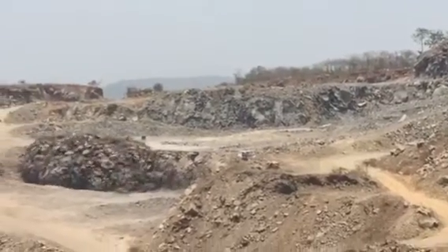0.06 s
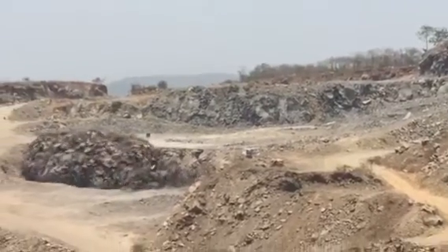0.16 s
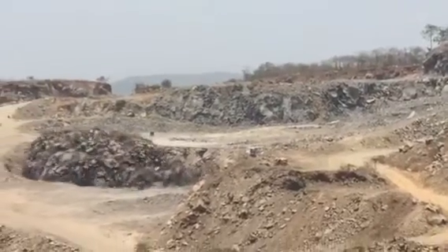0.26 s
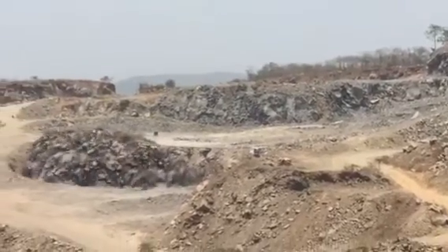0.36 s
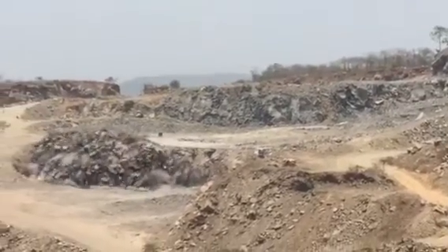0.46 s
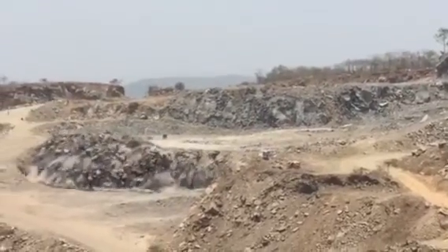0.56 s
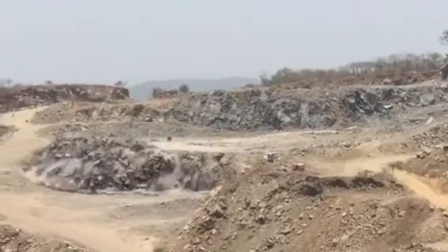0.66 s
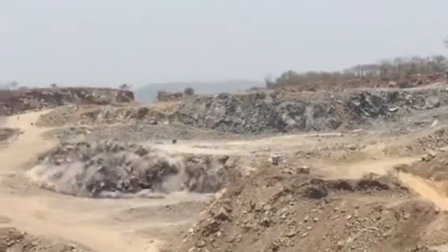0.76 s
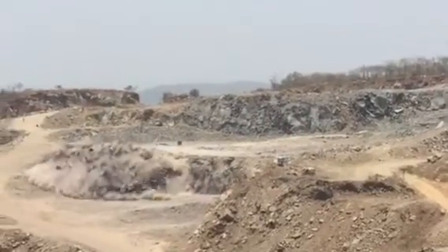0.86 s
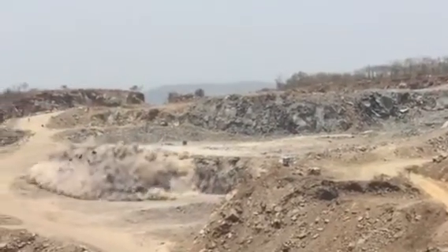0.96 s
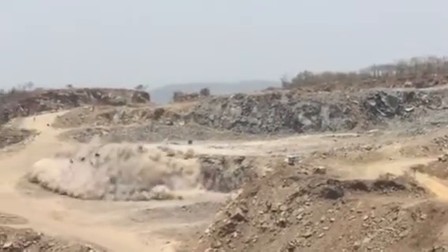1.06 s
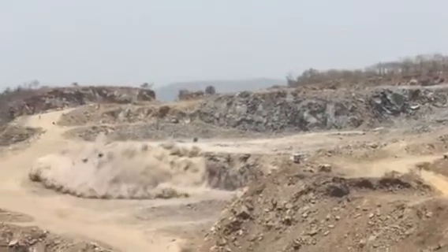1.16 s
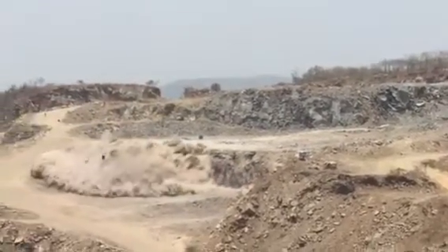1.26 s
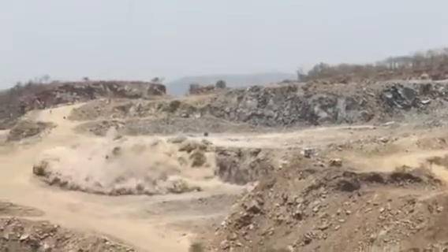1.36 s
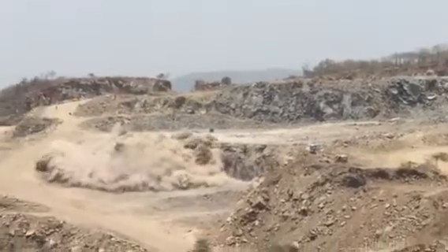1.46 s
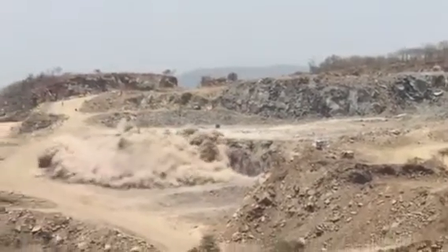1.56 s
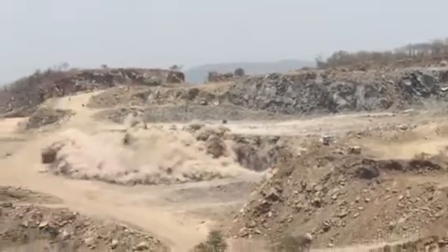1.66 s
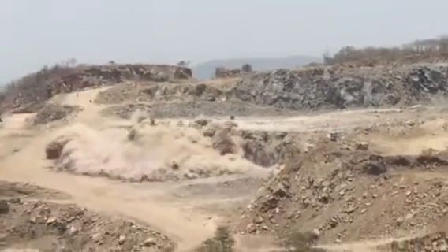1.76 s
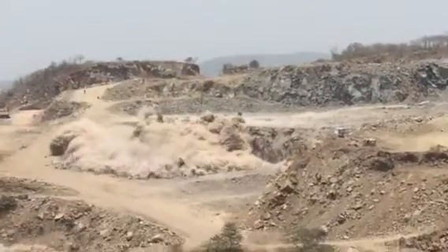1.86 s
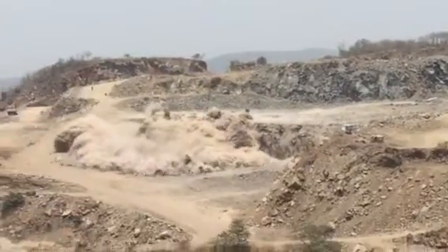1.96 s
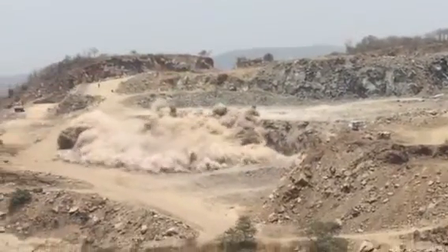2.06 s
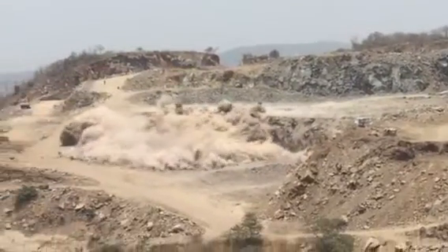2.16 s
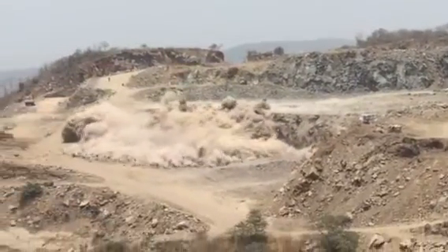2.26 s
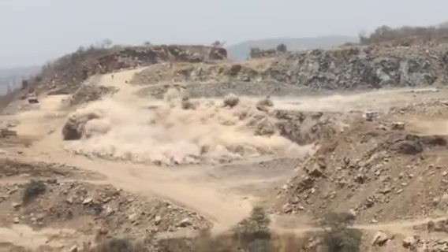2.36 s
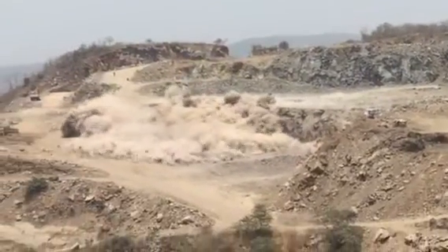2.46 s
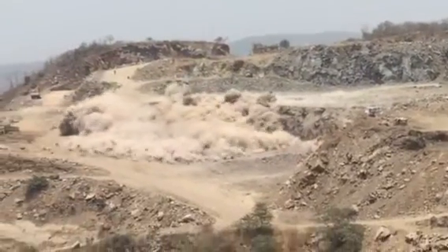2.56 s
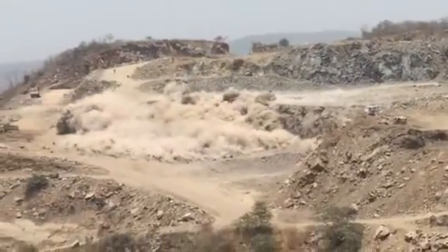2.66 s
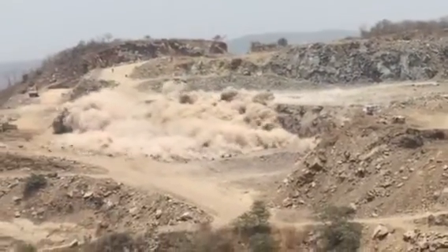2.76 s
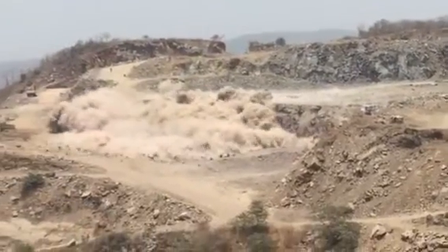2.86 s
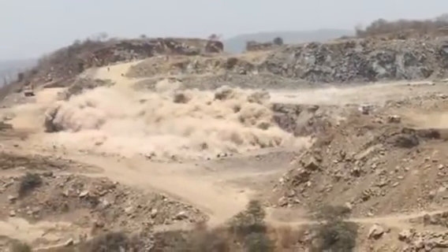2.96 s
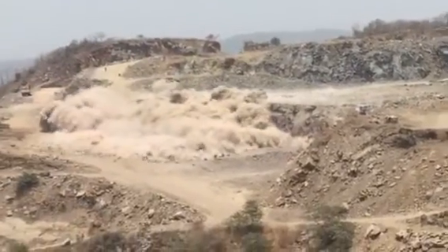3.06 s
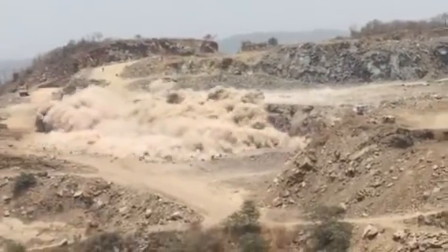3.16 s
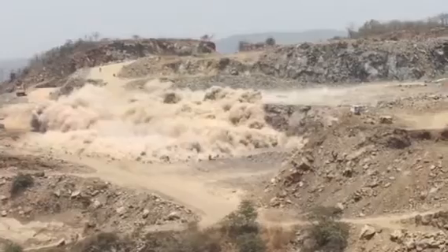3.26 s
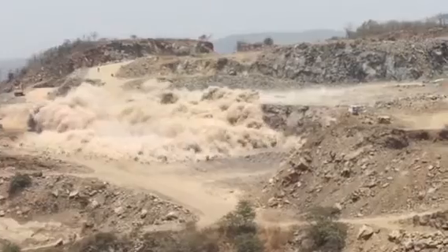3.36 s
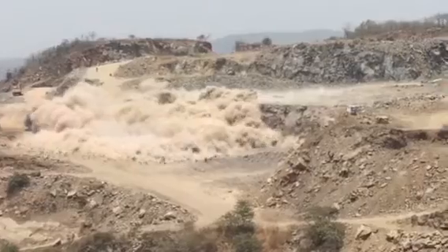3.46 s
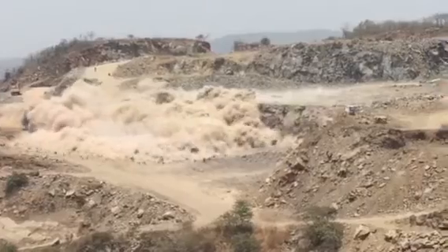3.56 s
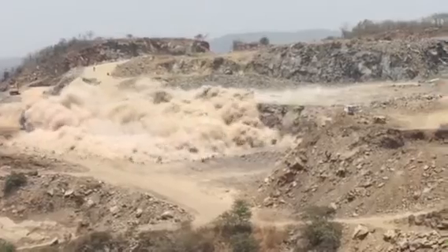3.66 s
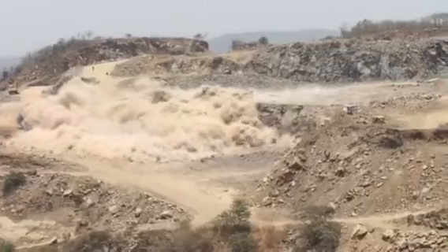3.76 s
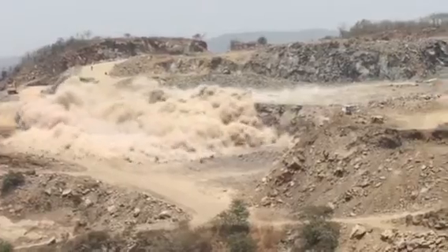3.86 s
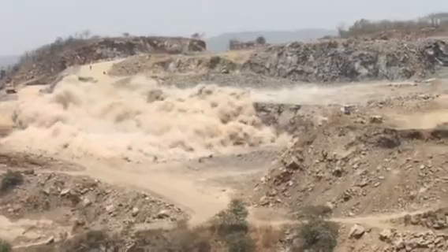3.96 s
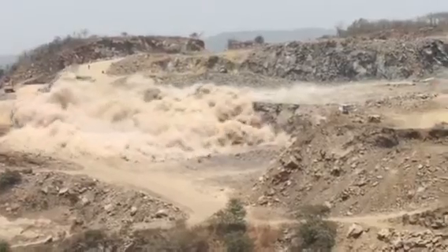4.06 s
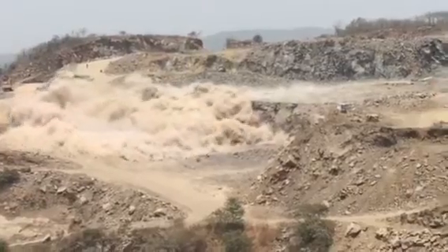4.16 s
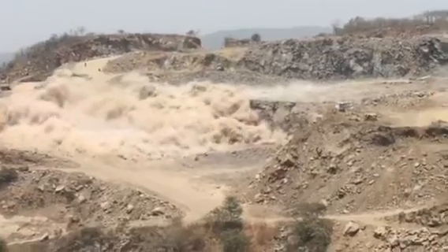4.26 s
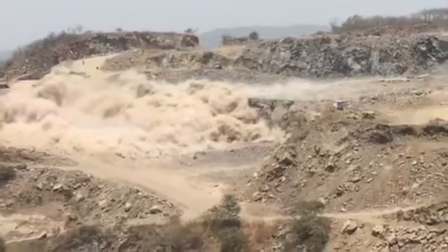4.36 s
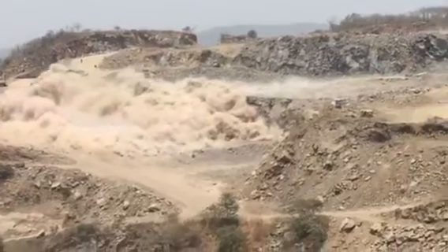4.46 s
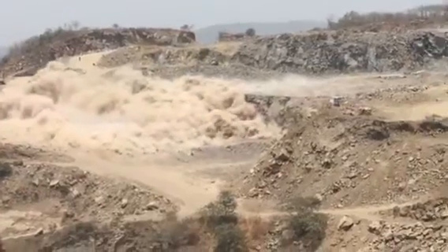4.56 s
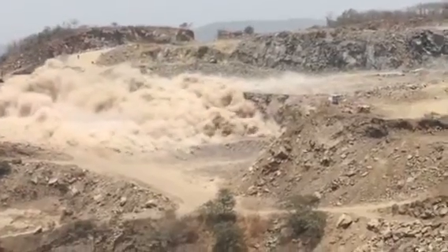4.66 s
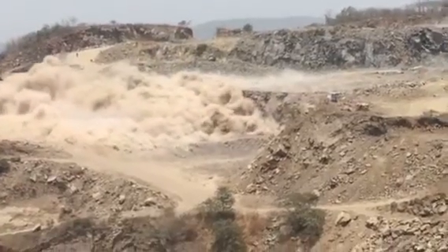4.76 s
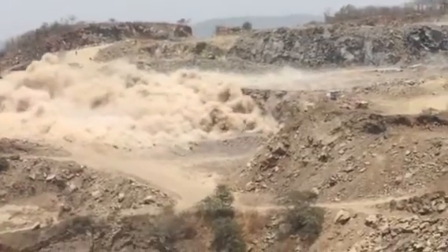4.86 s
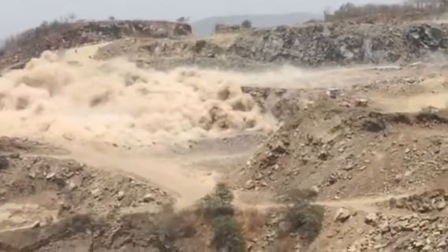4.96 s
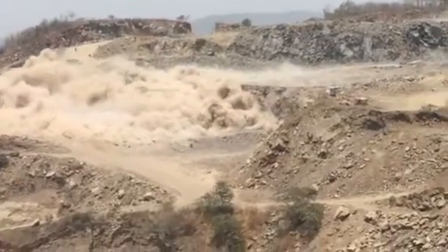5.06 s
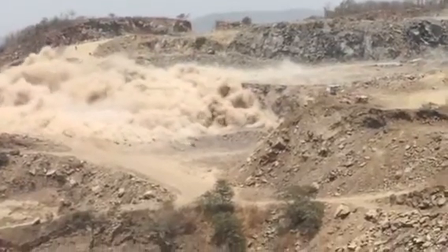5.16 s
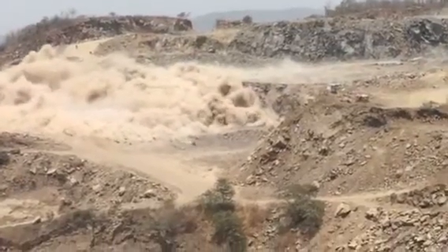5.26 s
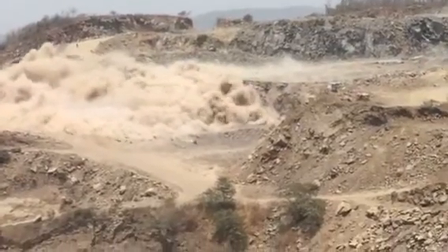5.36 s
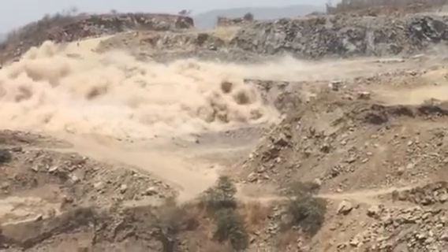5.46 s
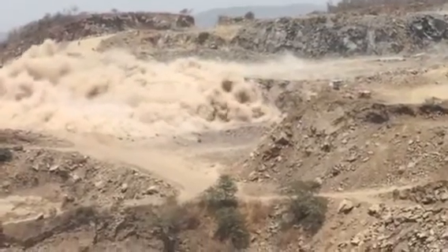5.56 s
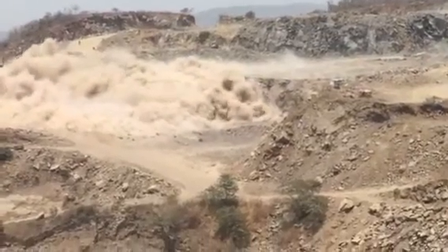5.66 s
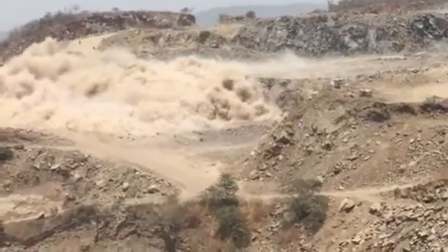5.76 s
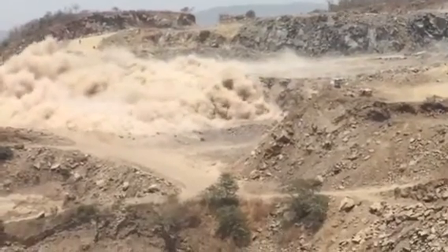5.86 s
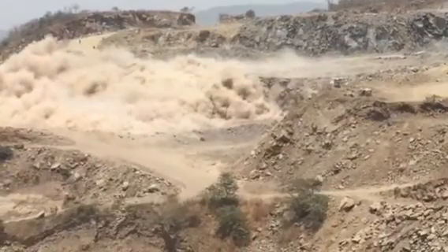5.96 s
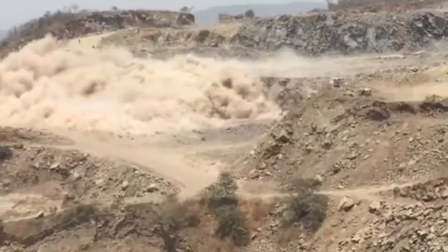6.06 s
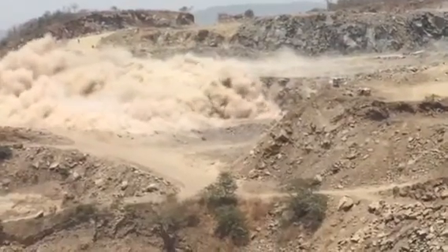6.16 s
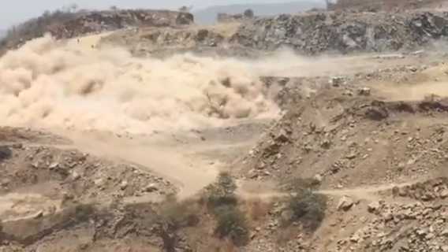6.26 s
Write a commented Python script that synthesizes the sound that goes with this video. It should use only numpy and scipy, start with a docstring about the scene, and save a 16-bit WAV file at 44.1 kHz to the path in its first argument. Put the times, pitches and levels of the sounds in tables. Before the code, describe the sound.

A rapid crackle of detonators bursts into heavy overloaded bangs, then a long rushing rockslide swells, thins and ends in scattered stone knocks.

```python
"""A quarry blast heard from the rim: detonators crackle along the bench, then charges burst and the ground heaves.
The cracks and bangs are short pressure pulses trailed by noise scatter; the heaves are brief low sines.
The face collapses in a long rush of boulders, stones and grit, each a dense hail of coloured impacts.
Last rocks knock, ring and tumble down one by one, over scuffs and a faint wash of wind.
The pit walls answer with a diffuse tail, and the heaviest blows overload the microphone."""
import sys
import numpy as np
from scipy import signal
from scipy.fft import rfft, irfft, next_fast_len
from scipy.io import wavfile
from scipy.ndimage import uniform_filter1d, map_coordinates

SR = 44100
rng = np.random.default_rng(int(sys.argv[2]) if len(sys.argv) > 2 else 0)


def dump_mix(stems):
    """Bounce the given channels to the path in sys.argv[1] as a 16-bit WAV at rate SR."""
    frames = np.atleast_2d(stems).T  # one column per channel
    limited = np.clip(frames, -1, 1)  # hard clip at full scale
    pcm = np.round(limited * 32767).astype(np.int16)
    wavfile.write(sys.argv[1], SR, pcm)


N = 278712

# Levels in the event tables are in dB; some layers add a gain of their own.
# surface detonators [t/s, level/dB, treble level/dB]
DETONATORS = [(.004, -10, -27), (.0265, -7, -22.5), (.047, -9, -30), (.065, -8, -23), (.078, -9, -33),
              (.096, -9, -24.5), (.109, -15.5, -38), (.1205, -7, -44), (.137, -12.5, -24.5),
              (.151, -9.5, -25), (.181, -8, -31.5), (.244, -21.5, -34.5), (.274, -15.5, -36.5)]
# charges breaking out of their holes [t/s, level/dB, f/Hz above which the overburden muffles them]
CHARGES = [(0.3051, -6.5, 1200), (0.3115, -5.5, 5000), (0.318, 2.5, 2400), (.324, -2.5, 6000),
           (.331, -9, 3500), (0.3711, -5.5, 3580), (0.394, -13, 1800), (.402, -8.5, 1800),
           (0.4251, -4, 3300), (0.454, -9, 3000), (.4637, -8, 12000), (.519, -18, 2580)]
# the bench heaves, bulges and drops [t/s, level/dB, f/Hz]
HEAVES = [(.245, -17, 81), (.311, -1.5, 196.5), (.321, -4.5, 311), (.342, -5.5, 69.2), (.412, -11, 137),
          (.475, -13, 74), (.545, -12.5, 98), (.572, -9.5, 70), (.612, -14.5, 127)]
# the largest boulders landing [t/s, level/dB, f/Hz]
BOULDERS = [(1.52, -7, 207), (1.76, -11, 198), (2.51, -14, 208), (2.868, -13.5, 189), (3.145, -14, 132),
            (3.39, -16.5, 335), (3.824, -19.5, 104), (4.04, -20, 136), (4.275, -21.5, 235),
            (4.33, -19.5, 262), (5.428, -29.5, 80.4), (5.642, -18, 210), (5.682, -18, 240),
            (5.742, -18, 300), (5.80, -22.5, 234), (6.132, -32.5, 106)]
# single rocks striking rock [t/s, level/dB, treble level/dB]
KNOCKS = [(3.277, -9, -54), (4.793, -29, -52), (5.18, -22, -44), (5.214, -22.5, -65), (5.36, -31, -60),
          (5.403, -27, -41), (5.497, -39, -36.5), (5.553, -27, -50), (5.631, -22, -52), (5.642, -19, -38),
          (5.68, -17.5, -45), (5.728, -24, -44), (5.745, -17.5, -41.5), (5.791, -26.5, -48),
          (5.849, -31.5, -45), (6.036, -27, -46.5), (6.19, -30.5, -60), (6.236, -28, -48)]
# hard stones that ring briefly when hit [t/s, level/dB, f/Hz]
PINGS = [(3.279, -48, 2860), (4.52, -53, 9500), (4.789, -40.5, 4360), (4.892, -35, 1960),
         (5.058, -36, 2620), (5.491, -38, 2760), (6.06, -42, 2720)]
# short scuffs close to the microphone [t/s, level/dB]
SCUFFS = [(4.625, -44.5), (5.051, -38.5), (5.489, -57)]

# Spectra give the tone only: the sound is rescaled after shaping.
# detonator crack, also the bright spray of every blow [f/Hz, level/dB]
CRACK_SPECTRUM = [(59, -54), (100, -7), (258, -7), (293, -9), (370, 0.5), (429, -11), (697, 3), (808, -4),
                  (1290, -6.5), (1550, -17), (2180, -16.5), (4860, -33.5), (5750, -31.5), (9150, -45.5),
                  (15500, -71)]
# charge before muffling [f/Hz, level/dB]
BANG_SPECTRUM = [(150, -25.5), (400, -2), (650, 4.5), (1280, -1), (2300, -10.5), (4400, -21), (7000, -25.5),
                 (10000, -38), (15500, -65)]
# rock striking rock [f/Hz, level/dB]
KNOCK_SPECTRUM = [(220, -22), (380, 0), (408, -5), (639, -1), (749, 0.5), (1350, -9.5), (1710, -9.5),
                  (2150, -10), (2630, -17.5), (3830, -21), (6260, -32), (12000, -77), (15600, -84),
                  (22000, -120)]
# boulders, crumbling masses and shaken ground [f/Hz, level/dB]
RUMBLE_SPECTRUM = [(13, -52), (22, -28), (59, -3), (150, -4.5), (201, -1), (278, -9), (354, -5.5),
                   (387, -9.5), (422, -21), (450, -27), (580, -46), (990, -120)]
# sliding stones [f/Hz, level/dB]
STONES_SPECTRUM = [(240, -4.5), (400, -11), (456, -7), (639, 3), (757, -1.5), (874, -2), (945, -7.5),
                   (1280, -4.5), (1990, -10), (3620, -20.5), (4510, -21.5), (4940, -24), (6410, -19),
                   (9000, -54), (11700, -74), (19800, -120)]
# sliding grit [f/Hz, level/dB]
GRIT_SPECTRUM = [(710, -0.5), (1200, 9.5), (1620, -7.5), (1900, -1), (2770, -10), (4530, -17.5),
                 (4930, -21), (5610, -20.5), (9080, -33), (11500, -51.5), (14400, -67), (15500, -72)]
# gritty scrape [f/Hz, level/dB]
SCUFF_SPECTRUM = [(300, -30), (1800, 6), (2700, 13), (3500, -6), (6000, -2), (9000, -16), (11000, -11),
                  (15500, -28)]
# wind over the pit [f/Hz, level/dB]
AIR_SPECTRUM = [(20, -8.5), (70, 13), (300, -17), (1000, -5), (4000, -15.5), (8000, -77), (11000, -39.5),
                (15500, -52)]
# decay of the pit's answer [f/Hz, t60/s]
PIT_DECAY = [(100, 1), (1000, 0.27), (4000, 0.24), (12000, 0.3)]

# the rock face throws each crack back once
SLAP_S, SLAP_LOSS_DB, SLAP_TREBLE_LOSS_DB = .0075, 3, 9
# each rock tumbles over two more edges
BOUNCE_S, BOUNCE_LOSS_DB, BOUNCE_TREBLE_LOSS_DB = .02, 8, 4
# gas thumps: level relative to the shot's own, centre pitch
PUFF_DB, PUFF_HZ = -14, 300  # detonators
THUMP_DB, THUMP_HZ = -11, 240  # charges
# the ground booms from the first charge on and passes only the lows
BOOM_DB, BOOM_ATTACK_S, BOOM_HOLD_S = -19, 0.0098, 0.17
BOOM_FADE_DB_PER_S, BOOM_TOP_HZ = 105, 240
FULL_FLOW_S = 1.52  # the slide is at its fullest
SLUMP_S, SLUMP_WIDTH_S, SLUMP_DB = 3.07, 0.58, 1.5  # a late load of stones slips down the pile
GROUND_HZ = 1200  # below this a pulse is delayed along the ground
TOP_HZ = 15750  # microphone band limit


def blast():
    """The detonator chain rattles, then the charges burst and lift the bench."""
    cracks = repeats(DETONATORS, SLAP_S, SLAP_LOSS_DB, SLAP_TREBLE_LOSS_DB, count=2)
    rattle = blows(cracks, CRACK_SPECTRUM, direct_db=-1.0, scatter_db=-6.0, scatter_t60=0.041,
                   spray_db=1.5, spray_t60=0.04, spray_hz=3000, vary_db=2.9)
    bangs = charges(scatter_db=-9.5, scatter_t60=0.046)
    puffs = amp(PUFF_DB) * gas_thumps(DETONATORS, PUFF_HZ, spread=0.24)
    thumps = amp(THUMP_DB) * gas_thumps(CHARGES, THUMP_HZ, spread=0.24)
    heave = amp(1.0) * thuds(HEAVES, cycles=0.91, rough=0.18)
    return rattle + bangs + puffs + thumps + heave + boom()


def charges(scatter_db, scatter_t60):
    """Steep pressure fronts, the duller the deeper they lie, each trailed by scatter off the rubble."""
    track, t = np.zeros(N), np.arange(SR // 8) / SR
    front = pulse(BANG_SPECTRUM)
    for s, db, muffle_hz in CHARGES:
        shape = band(front, muffle_hz, "low", order=3)
        shape /= np.abs(shape).max()
        decay = amp(scatter_db - 60 * t / scatter_t60)
        echoes = rng.standard_normal(len(t)) * decay / np.linalg.norm(shape)
        echoes[0] = 1  # the direct front
        add(track, s, amp(db) * signal.fftconvolve(echoes, shape))
    return track


def gas_thumps(shots, hz, spread):
    """The gas of every shot gives one short push, each at a slightly different pitch."""
    pushes = [(s, db, hz * np.exp(spread * rng.standard_normal())) for s, db, _ in shots]
    return thuds(pushes, cycles=1.0, rough=.2)


def thuds(table, cycles, rough):
    """A heavy mass pushes the air for a cycle or two; its crumbling roughens the push."""
    track, t = np.zeros(N), np.arange(SR // 4) / SR
    for s, db, hz in table:
        age = t * hz / cycles
        swell = age * np.exp(1 - age)
        crumble = colour(rng.standard_normal(len(t)), RUMBLE_SPECTRUM)
        push = np.sin(2 * np.pi * hz * t) + rough * crumble
        add(track, s, amp(db) * swell * push)
    return track


def boom():
    """The shaken ground rumbles from the first charge, holds briefly, then dies away."""
    age = np.arange(N) / SR - CHARGES[0][0]
    level_db = BOOM_DB - BOOM_FADE_DB_PER_S * np.maximum(age - BOOM_HOLD_S, 0)
    rumble = colour(rng.standard_normal(N), RUMBLE_SPECTRUM)
    ground = unit(band(rumble, BOOM_TOP_HZ, "low"))
    return ground * np.clip(age / BOOM_ATTACK_S, 0, 1) * amp(level_db)


def blows(table, spectrum, direct_db, scatter_db, scatter_t60, spray_db, spray_t60, spray_hz, vary_db):
    """Each blow is a pressure pulse, its scatter off broken rock and a short bright spray."""
    track, t = np.zeros(N), np.arange(SR // 8) / SR
    bright = band(pulse(CRACK_SPECTRUM), spray_hz, "high")
    front = band(1. * (t == 0), 4300, "low")  # distance rounds the direct pulse
    for s, db, treble_db in table:
        shape = pulse([(hz, level + vary_db * rng.standard_normal()) for hz, level in spectrum])
        scatter_decay = amp(scatter_db - 60 * t / scatter_t60)
        echoes = rng.standard_normal(len(t)) * scatter_decay / np.linalg.norm(shape)
        echoes *= 1 - np.exp(-t / 0.00055)  # the detours arrive after the direct pulse
        echoes += amp(direct_db) * front
        spray_decay = amp(spray_db - 60 * t / spray_t60)
        spray = rng.standard_normal(len(t)) * spray_decay / np.linalg.norm(bright)
        body = amp(db) * signal.fftconvolve(echoes, shape)
        treble = amp(treble_db) * signal.fftconvolve(spray, bright)
        add(track, s, body + treble)
    return track


def repeats(table, gap_s, loss_db, treble_loss_db, count):
    """Each blow and its weaker repeats, at uneven gaps; count includes the first blow."""
    gaps = gap_s * (.5 + rng.random((len(table), count)))
    return [(s + gap[:k].sum(), db - k * loss_db, treble_db - k * treble_loss_db)
            for (s, db, treble_db), gap in zip(table, gaps) for k in range(count)]


def pulse(spectrum, size=4096):
    """A pressure pulse with this spectrum, at peak 1; grazing the ground makes its lows trail its highs."""
    hz = np.fft.rfftfreq(size, 1 / SR)
    # folding the cepstrum packs the energy towards the onset
    cepstrum = irfft(np.log(amp(along(spectrum, hz)) + 1e-6))
    cepstrum[1:size // 2] *= 2
    cepstrum[size // 2 + 1:] = 0
    lag = np.exp(-4j * np.arctan(hz / GROUND_HZ))
    shape = irfft(np.exp(rfft(cepstrum)) * lag)
    return shape / np.abs(shape).max()


def rockslide():
    """Boulders rumble, stones clatter and grit hisses, each as a dense hail of impacts."""
    t = np.arange(N) / SR
    boulders_db = flow_db(peak_db=-22, rise_db_per_s=13.5, fade_db_per_s=6.0, run_out_s=3.1,
                          settle_s=.3, settle_db=1.5, trickle_db=-56.5)
    stones_db = flow_db(peak_db=-25.5, rise_db_per_s=14.5, fade_db_per_s=2.5, run_out_s=4.07,
                        settle_s=1.44, settle_db=24, trickle_db=-59)
    stones_db = stones_db + SLUMP_DB * np.exp(-((t - SLUMP_S) / SLUMP_WIDTH_S) ** 2)
    grit_db = flow_db(peak_db=-29.5, rise_db_per_s=20.5, fade_db_per_s=6.5, run_out_s=3.11,
                      settle_s=0.16, settle_db=6.5, trickle_db=-66.5)
    surge = wobble(21)  # the rock comes down in uneven loads
    rumble = colour(hail(rate=900, spread_db=2.5), RUMBLE_SPECTRUM)
    boulders = rumble * amp(boulders_db + 2.26 * wobble(12))
    clatter = band(colour(hail(rate=6000, spread_db=1.0), STONES_SPECTRUM), 3740, "low")
    stones = patchy(clatter, depth_db=0.95) * amp(stones_db + 0.28 * surge)
    hiss = band(colour(hail(rate=8000, spread_db=1.0), GRIT_SPECTRUM), 2590, "high")
    grit = patchy(hiss, depth_db=2.0) * amp(grit_db + 0.5 * surge)
    # as the slide thins out, single stones stand clear of the rush
    single_db = .5 * stones_db - 27.5
    single = chips(count=2000, centre_hz=2193, octaves=1.2, cycles=2.6, spread_db=5.0) * amp(single_db)
    # the rumble is there from the start; the stones fade in as the face loosens
    loosened = np.clip(t / 0.29, 0, 1) ** 2
    return boulders + loosened * (stones + grit + single)


def flow_db(peak_db, rise_db_per_s, fade_db_per_s, run_out_s, settle_s, settle_db, trickle_db):
    """Level of one size of rock: it swells as the face gives way, ebbs, runs out and settles to a trickle."""
    t = np.arange(N) / SR
    swell = rise_db_per_s * np.maximum(FULL_FLOW_S - t, 0)
    ebb = fade_db_per_s * np.maximum(t - FULL_FLOW_S, 0)
    settling = settle_db * np.clip((t - run_out_s) / settle_s, 0, 1)
    return 20 * np.log10(amp(peak_db - swell - ebb - settling) + amp(trickle_db))


def hail(rate, spread_db):
    """Countless impacts at random moments, rate a second: many small, a few large."""
    moment, weight, side = rng.random((3, N))
    size = np.minimum(-np.log(1 - weight), 5)
    return (moment < rate / SR) * np.sign(side - .5) * amp(spread_db * size)


def patchy(x, depth_db, size=1024):
    """A random gain field, smoothed over time and pitch, makes the noise patchy; rms 1."""
    z = signal.stft(x, nperseg=size)[2]
    field = uniform_filter1d(rng.standard_normal(z.shape), size=5, axis=0)  # smooth over pitch
    field = uniform_filter1d(field, size=5, axis=1)  # and over time
    return unit(signal.istft(z * amp(depth_db * unit(field)), nperseg=size)[1][:N])


def chips(count, centre_hz, octaves, cycles, spread_db):
    """Small stones clink at random, each with its own pitch and size; rms 1."""
    track, t = np.zeros(N), np.arange(SR // 50) / SR
    for when, pitch, size, turn in rng.random((count, 4)):
        hz = centre_hz * 2 ** (octaves * (2 * pitch - 1))
        life = t * hz / cycles
        ring = np.sin(2 * np.pi * (hz * t + turn)) * np.exp(-life) * (1 - np.exp(-t * hz))
        loudness = amp(-spread_db * np.log(size + 0.024)) * np.sqrt(centre_hz / hz)
        add(track, when * N / SR, ring * loudness)
    return unit(track)


def falling_rocks():
    """Big blocks land with a thud; late rocks knock and bounce their way down the pile."""
    contacts = repeats(KNOCKS, BOUNCE_S, BOUNCE_LOSS_DB, BOUNCE_TREBLE_LOSS_DB, count=3)
    knocks = blows(contacts, KNOCK_SPECTRUM, direct_db=-2.0, scatter_db=-12.0, scatter_t60=0.093,
                   spray_db=0.0, spray_t60=0.12, spray_hz=2180, vary_db=2)
    landings = amp(-4.0) * thuds(BOULDERS, cycles=0.92, rough=.3)
    return knocks + landings


def pings():
    """One quickly dying, unsteady mode per stone."""
    track, t = np.zeros(N), np.arange(SR // 8) / SR
    for s, db, hz in PINGS:
        drift = band(np.cumsum(rng.standard_normal(len(t))) * 0.094, 400, "low")  # phase, radians
        envelope = amp(db - 60 * t / 0.091) * (1 - np.exp(-t / 0.0025))
        add(track, s, envelope * np.sin(2 * np.pi * hz * t + drift))
    return track


def scuffs():
    """Brief gritty scrapes of sparse noise grains, near enough to keep much of their treble."""
    track, t = np.zeros(N), np.arange(SR // 6) / SR
    for s, db in SCUFFS:
        age = t / 0.011
        grains = rng.standard_normal(len(t)) * (rng.random(len(t)) < 1800 / SR)
        scrape = band(colour(grains, SCUFF_SPECTRUM), 12500, "low")
        add(track, s, amp(db) * age * np.exp(1 - age) * scrape)
    return track


def pit_walls(x):
    """The diffuse answer of the rock faces: a decaying noise tail, each pitch with its own decay time."""
    hz, t, z = signal.stft(rng.standard_normal(SR), SR, nperseg=256)
    decay = amp(-60 * t / along(PIT_DECAY, hz)[:, None])
    tail = signal.istft(z * decay, SR, nperseg=256)[1]
    return signal.fftconvolve(x, tail / np.linalg.norm(tail))[:N]


def open_air():
    """A faint, slightly wavering wash of wind over the pit."""
    return colour(rng.standard_normal(N), AIR_SPECTRUM) * amp(-50 + 0.58 * wobble(2.37))


def amp(db):
    """Decibels to gain."""
    return 10 ** (np.asarray(db) / 20)


def unit(x):
    """x at rms 1."""
    return x / np.sqrt(np.mean(x ** 2) + 1e-20)


def along(points, hz):
    """Read (f/Hz, value) points at any frequency, on a log axis."""
    f, v = np.transpose(points)
    return np.interp(np.log(hz + 1), np.log(f + 1), v)


def add(track, s, sound):
    """Mix a sound into the track at time s."""
    start = max(0, round(s * SR))
    track[start:start + len(sound)] += sound[:N - start]


def wobble(rate):
    """A smooth random curve, rate knots a second."""
    knots = rng.standard_normal(int(N * rate / SR) + 4)
    return map_coordinates(knots, [np.arange(N) * rate / SR])


def colour(x, spectrum):
    """x shaped by a spectrum, at rms 1."""
    m = next_fast_len(len(x) + SR // 10)
    gain = amp(along(spectrum, np.fft.rfftfreq(m, 1 / SR)))
    return unit(irfft(rfft(x, m) * gain, m)[:len(x)])


def band(x, hz, kind, order=2):
    """Causal low-pass or high-pass."""
    sos = signal.butter(order, min(hz, SR / 2 - 1), kind, fs=SR, output="sos")
    return signal.sosfilt(sos, x)


def scene():
    """Blast and rockfall in the open pit; the walls answer the single hits."""
    hits = blast() + falling_rocks() + pings()
    answer = amp(-16.0) * pit_walls(hits)
    return (hits + answer + rockslide() + scuffs() + open_air())[None]


def record(dry):
    """The microphone flattens the highest peaks and keeps nothing above its band limit."""
    ceiling = .72  # full scale is 1
    clipped = dry / (1 + np.abs(dry / ceiling) ** 8) ** (1 / 8)
    m = next_fast_len(N + SR // 2)
    in_band = np.fft.rfftfreq(m, 1 / SR) < TOP_HZ
    return irfft(rfft(clipped, m) * in_band, m)[..., :N]


dry = scene()
out = record(dry)
dump_mix(out)
```